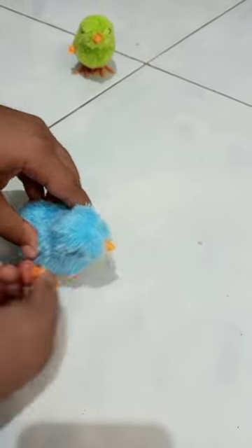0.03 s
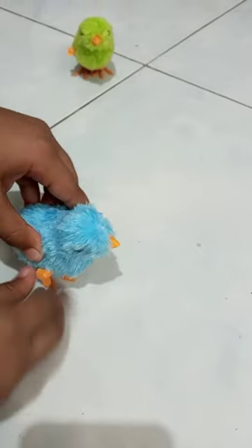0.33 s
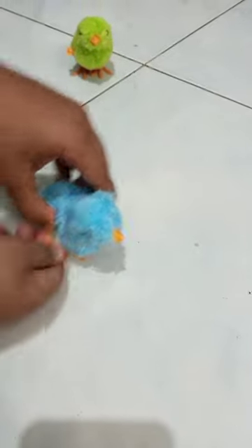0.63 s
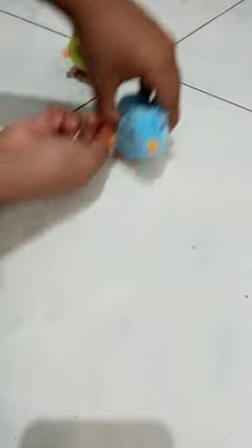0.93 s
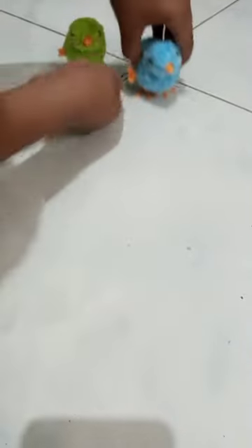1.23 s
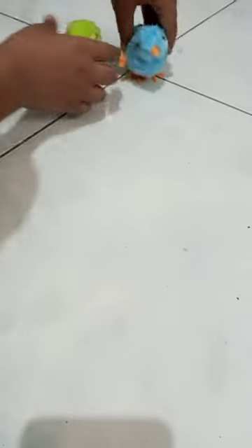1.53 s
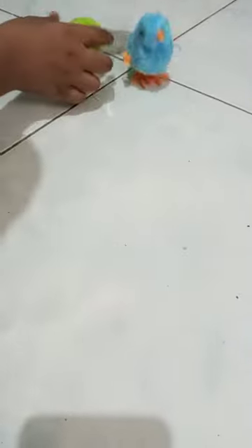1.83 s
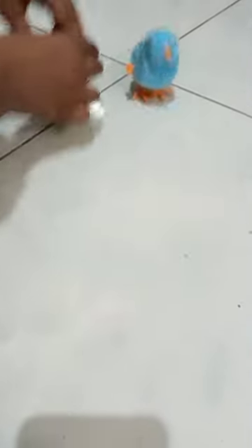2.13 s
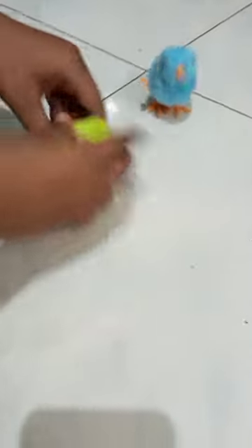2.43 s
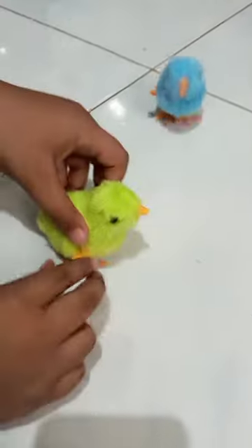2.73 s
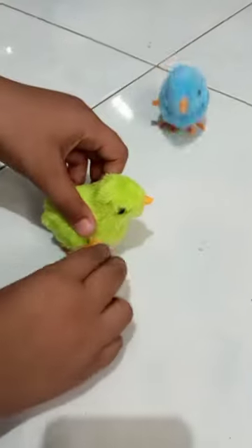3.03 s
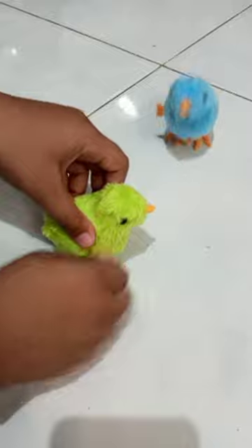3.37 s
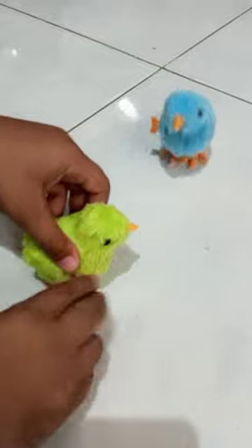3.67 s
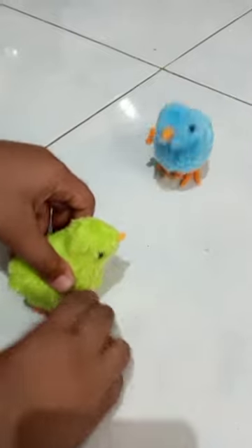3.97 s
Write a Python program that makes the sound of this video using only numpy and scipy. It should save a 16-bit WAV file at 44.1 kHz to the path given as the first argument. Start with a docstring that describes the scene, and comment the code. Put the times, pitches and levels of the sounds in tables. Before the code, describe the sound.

Rapid plastic clacking of a hopping wind-up toy on tile, after faint winding clicks.

```python
"""A plastic wind-up chick hops on a tiled floor, after being wound and set down with a scuff.
Seven times a second the spring snaps the legs, the gears whirr in the air and the feet clack down;
each hit makes the plastic body ring. A second toy is wound meanwhile. The small hard room rings
briefly. Behind it are a faint hiss, a low hum that comes and goes, a few dull knocks from handling
the toy, and the soft thuds of a hand bumping the microphone."""
import sys
import numpy as np
from scipy import signal
from scipy.fft import rfft, irfft
from scipy.io import wavfile

SR = 44100
rng = np.random.default_rng(int(sys.argv[2]) if len(sys.argv) > 2 else 0)


def log_audio(samples):
    """Write samples as a 16-bit WAV file to the path given in sys.argv[1]."""
    # one column per channel
    frames = np.atleast_2d(samples).T
    # limit to full scale, then quantise
    limited = np.clip(frames, -1, 1)
    pcm = np.round(limited * 32767).astype(np.int16)
    wavfile.write(sys.argv[1], SR, pcm)


N = 176400
TIME = np.arange(N) / SR

# The notes at which the toy's body rings:
# (pitch [Hz], width [Hz], level when kicking [dB], when landing [dB], when wound [dB])
BODY = [(1501,197,-4.5,-1.5,-30),(2645,206,-3,-13.5,-20.5),(2738,310,-6,-2.5,-11.5),(3138,580,-12,-11.5,-15),(4631,317,-1.5,-12,-4.5),(5072,260,-3,-16,-7.5),(5319,217,1,-11.5,-5.5),
        (6340,547,-7.5,-11,-8),(7036,350,-6.5,-12,-12.5),(8370,370,-9,-7.5,-24.5),(9337,385,-6,-5.5,-15.5),(9840,430,-8,-11,-19),(10650,980,-21.5,-18,-32),(12820,1140,-20,-16,-53)]
# Four pitch zones, low to high, that shape the tone of a hit: (centre [Hz])
ZONES_HZ = [1550, 2700, 5000, 8500]
# The legs kick off: (time [s], relative crack level [dB], ring level in each of the four zones [dB])
KICKS = [(1.6411, -15, -29.5, -25, -39, -31), (1.7253, -17, -36, -28, -37, -28),
         (1.8745, -33, -40.5, -34.5, -36, -29), (2.016, -15, -31.5, -34, -30.5, -30),
         (2.1555, -17, -40.5, -28, -32, -29.5), (2.2983, -16, -41.5, -28.5, -30.5, -28),
         (2.4434, -37, -45, -33, -34.5, -28), (2.592, -11, -42, -29.5, -31, -29),
         (2.7384, -8, -46.5, -32, -30.5, -29.5), (2.883, -10, -56, -38, -26.5, -28.5),
         (3.037, -9, -36, -30, -34.5, -30), (3.1767, -15, -36, -32.5, -28, -30),
         (3.3254, -12, -35.5, -30.5, -33, -31), (3.469, -19.5, -34.5, -37, -28, -28),
         (3.6131, -25, -46.5, -30.5, -30.5, -29.5), (3.7618, -30, -40, -43, -29.5, -30.5),
         (3.91, -21, -52, -34, -26, -32.5)]


def from_db(db):
    """Turn decibels into a number to multiply by."""
    return 10 ** (np.asarray(db) / 20)


def rms_one(x):
    """Scale a sound so that its average strength (rms) is 1."""
    return x / np.sqrt(np.mean(x ** 2) + 1e-20)


def unit_click(x):
    """Give a short sound the same energy as 10 ms of sound at strength 1."""
    return x * np.sqrt(.01 * SR / (np.sum(x ** 2) + 1e-20))


def add(out, start_s, x):
    """Mix x into out, beginning at start_s."""
    i = int(np.clip(start_s * SR, 0, N - 1))
    out[i:i + len(x)] += x[:N - i]


def keep_side(x, hz, side, order=2):
    """Keep the "low" or the "high" side of hz and fade out the other."""
    return signal.sosfilt(signal.butter(order, hz, side, fs=SR, output="sos"), x)


def resonate(x, hz, width_hz):
    """Make x ring at one pitch; a narrower width rings longer."""
    r = np.exp(-np.pi * 1.5 * width_hz / SR)
    b = (1 - r * r) / 2 * np.array([1, 0, -1])
    a = [1, -2 * r * np.cos(2 * np.pi * hz / SR), r * r]
    return signal.lfilter(b, a, signal.lfilter(b, a, x + 1e-18))


def colour(x, points):
    """Shape the tone of x along (pitch [Hz], level [dB]) points; the result has strength 1."""
    hz, db = np.transpose(points)
    freqs = np.maximum(np.arange(N // 2 + 1) * SR / N, 1)
    gain = from_db(np.interp(np.log(freqs), np.log(hz), db))
    return rms_one(irfft(rfft(x) * gain, N))


def grains(per_s, size):
    """Tiny taps at random moments, of random strength."""
    return (rng.random(size) < per_s / SR) * rng.standard_normal(size)


def contact(chatter_s):
    """Parts that meet buzz against each other briefly, then settle more quietly and slowly."""
    t = TIME[:1200]
    rise = 1 - np.exp(-(t + 1 / SR) / .00044)
    buzz = np.exp(-(t / chatter_s) ** 2)
    settle = from_db(-7) * np.exp(-t / (1.5 * chatter_s))
    return grains(per_s=6000, size=len(t)) * rise * (buzz + settle)


def clack(note_db, crack_db, chatter_s):
    """One hit gives a bright crack and rings all the body's notes, a little differently each time."""
    spread_db, detune = 2.5, .016
    force = contact(chatter_s)
    out = from_db(crack_db - 18.5) * unit_click(keep_side(force, 2380, "high"))
    for (hz, width, *_), db in zip(BODY, note_db):
        ring = resonate(force, hz * rng.normal(1, detune), width)
        out += from_db(rng.normal(db, spread_db)) * unit_click(ring)
    return out


def shell(ticks, note_db):
    """Small ticks ring through the toy's plastic body; the result has strength 1."""
    rings = [rms_one(resonate(ticks, hz, width)) for hz, width, *_ in BODY]
    return rms_one(sum(from_db(db) * ring for db, ring in zip(note_db, rings)))


def air():
    """A faint, steady background hiss."""
    # The tone of the hiss: (pitch [Hz], relative level [dB])
    tone = [(18, -57), (30, -10), (102, -3), (612, -6.5), (880, -4), (1200, -7), (1440, 1), (1920, 1.5),
            (2240, -5.5), (2620, 4), (3580, -19), (4530, -12), (9380, -27.5), (11000, -45), (15000, -29)]
    return from_db(-62) * keep_side(colour(rng.standard_normal(N), tone), 56, "high")


def rasps(note_db):
    """Fine ratchet teeth slip past in short runs as a key is turned."""
    # Runs of teeth: (start [s], length [s], level [dB], tilt toward the treble [dB per octave])
    runs = [(0,0.022,-57,7),(.052,0.035,-46.5,4),(0.503,0.017,-54,3),(0.788,0.039,-56.5,-7),(1.281,0.096,-64.5,-15),(2.967,0.098,-52,-2.5),(3.158,0.16,-43,-7),(3.25,.06,-62,2),(3.352,0.052,-44.5,13),(3.87,0.12,-48.5,-12)]
    out = np.zeros(N)
    octaves = np.log2(np.array(BODY)[:, 0] / ZONES_HZ[2])
    for start, length, db, tilt in runs:
        teeth = grains(per_s=890, size=int(length * SR))
        fade = signal.windows.tukey(len(teeth), .5)
        add(out, start, from_db(db) * shell(teeth, note_db + tilt * octaves) * fade)
    return out


def winding(note_db):
    """The key, the ratchet and loose parts click against the body."""
    # Clicks: (time [s], relative level [dB], tilt toward the treble [dB per octave])
    clicks = [(.006,-47.5,-1),(.017,-58,-3),(.028,-45,2),(0.043,-35,-2),(.081,-43,-5),(.111,-44,15),(0.121,-34.5,-7.5),(0.322,-59.5,12.5),(0.473,-54.5,-10.5),(0.503,-48.5,7),(.541,-45.5,-5),(0.658,-38,-5),(0.663,-38,-2.5),(0.72,-45,-2),(0.794,-50,-3),(.947,-51,-7),(0.956,-58.5,21),(0.991,-42.5,15.5),(1.175,-52.5,-16.5),(1.695,-49,-6),
              (2.777,-30.5,-7),(2.901,-32,-6),(3.214,-28,-4),(3.222,-29,-14),(3.401,-28.5,3),(3.434,-36.5,-10),(3.488,-32,-4),(3.928,-23.5,-1),(3.942,-44,-18)]
    out = np.zeros(N)
    octaves = np.minimum(np.log2(np.array(BODY)[:, 0] / ZONES_HZ[2]), 1)
    for start, db, tilt in clicks:
        add(out, start, clack(note_db + db + tilt * octaves, db, chatter_s=.0035))
    return out


def reflections():
    """The room's answer to a click: a near wall's echo and a tail that dies sooner in the treble."""
    split_hz, low_fade_s, high_fade_s = 7000, .3, .27  # each fade is the time to fall 60 dB
    tail_delay_s, wall_delay_s, wall_spread_s = .0053, .015, .0018
    t = TIME[:SR // 2]
    noise = rng.standard_normal((3, len(t)))
    low = keep_side(noise[0], split_hz, "low") * from_db(-60 * t / low_fade_s)
    high = keep_side(noise[1], split_hz, "high") * from_db(-60 * t / high_fade_s)
    tail = (low + high) * (t > tail_delay_s)
    tail += from_db(9.5) * resonate(tail, hz=1956, width_hz=212)  # the room rings most here
    wall = noise[2] * (t > wall_delay_s) * np.exp(-abs(t - wall_delay_s) / wall_spread_s)
    return from_db(-7.5) * tail / np.linalg.norm(tail) + from_db(-15.5) * wall / np.linalg.norm(wall)


def room(x):
    """The toy keeps moving, so every 70 ms of its sound meets a new set of echoes."""
    out, step = np.zeros(N), int(.07 * SR)
    for i in range(0, N, step):
        add(out, i / SR, signal.fftconvolve(x[i:i + step], reflections()))
    return out


def hum():
    """A low tone with a little rumble comes and goes."""
    # Times when the hum swells: (start [s], end [s], level [dB])
    swells = [(0.097,0.296,-66),(0.61,0.944,-61),(1.41,1.604,-60.5),(1.677,1.844,-60.5),(1.947,2.27,-60.5),(2.355,2.442,-57.5),(3.025,3.193,-61.5),(3.813,4.1,-62.5)]
    # The tone of the rumble: (pitch [Hz], relative level [dB])
    rumble_tone = [(25,-29),(60,-8),(105,9),(150,1),(220,-0.5),(400,-54)]
    hum_hz, fade_s, rest_db = 153.4, .055, -79
    level = np.full(N, from_db(rest_db))
    for start, end, db in swells:
        level += from_db(db) * np.clip(np.minimum(TIME - start, end - TIME) / fade_s + .5, 0, 1)
    tone = np.sqrt(2) * np.sin(2 * np.pi * hum_hz * TIME)
    rumble = from_db(-7.5) * colour(rng.standard_normal(N), rumble_tone)
    return level * (tone + rumble)


def knocks():
    """Dull knocks as the toy is handled, the last with a faint lingering ring."""
    # Knocks: (time [s], level [dB], pitch [Hz], time to fall 60 dB [s])
    hits = [(.115,-60,136,0.036),(.122,-61,980,0.044),(0.138,-57.5,138,0.052),(.142,-58,807,0.087),(.19,-57.5,514,0.49)]
    out, t = np.zeros(N), TIME[:SR]
    for start, db, hz, fade_s in hits:
        ring = np.sin(2 * np.pi * hz * t) * from_db(-60 * t / fade_s)
        rise = 1 - np.exp(-20 * t / fade_s)
        add(out, start, from_db(db) * unit_click(ring * rise))
    return out


def squeal():
    """The sliding feet sing a rough note that mostly falls."""
    # The path of the note: (time [s], pitch [Hz], level [dB])
    path = [(0.936,5160,-63),(.95,5150,-45),(.962,5150,-45.5),(.97,5290,-69),(0.999,5380,-54),(1.03,5200,-46.5),(1.07,4840,-58),(1.11,4700,-51),(1.14,4500,-66)]
    times, hz, db = np.transpose(path)
    width_hz = 300
    grip = keep_side(rng.standard_normal(N) + 1j * rng.standard_normal(N), width_hz / 2, "low")
    phase = 2 * np.pi * np.cumsum(np.interp(TIME, times, hz)) / SR
    note = rms_one(np.real(grip * np.exp(1j * phase)))  # slow noise moved up to the note's pitch
    return note * from_db(np.interp(TIME, times, db, left=-120, right=-120))


def stroke(loudness, tone):
    """Plastic sticks and slips over the tile in many tiny jerks; the grip limits their size."""
    times, db = np.transpose(loudness)
    spread_db, stutter_hz = 2, 180
    stutter = rms_one(keep_side(rng.standard_normal(N), stutter_hz, "low"))
    slip_size = np.tanh(from_db(spread_db * stutter) / 2)
    slips = np.sign(grains(per_s=2400, size=N)) * slip_size
    return colour(slips, tone) * from_db(np.interp(TIME, times, db, left=-120, right=-120))


def scuff():
    """The feet drag twice over the tile, squealing and catching now and then."""
    # How each drag swells and fades: (time [s], level [dB])
    first_drag = [(.97,-70),(1.003,-60),(1.016,-42),(1.045,-46),(1.065,-45.5),(1.095,-45.5),(1.135,-66),(1.16,-86)]
    second_drag = [(1.16,-79),(1.187,-58.5),(1.215,-41.5),(1.232,-43),(1.25,-56),(1.265,-77),(1.3,-86)]
    # The tone of each drag: (pitch [Hz], relative level [dB])
    first_tone = [(1470, -39), (2500, -9), (3170, -15), (3340, -31), (4140, -32), (4680, 0), (5290, 0),
                  (5730, -3), (6380, 0.5), (11200, -13), (14000, -19)]
    second_tone = [(1180, -60), (2000, -28), (2620, 4), (3400, -13), (3680, -55), (4440, -8), (5400, -1),
                   (6780, -6.5), (9470, -5), (12300, -23), (14000, -14)]
    # The feet catch and squeak: (time [s], level [dB], pitch [Hz], buzz time [s])
    catches = [(1.025,-44,5550,0.0018),(1.037,-42,6260,0.0022),(1.049,-47,7200,0.0042),(1.216,-58,2600,0.011),(1.236,-40,9400,0.0083),(1.246,-46,9600,0.0012)]
    out = stroke(first_drag, first_tone) + stroke(second_drag, second_tone) + squeal()
    for start, db, hz, chatter_s in catches:
        squeak = resonate(contact(chatter_s), hz, width_hz=700)
        add(out, start, from_db(db) * unit_click(squeak))
    return out


def blows(hits, note_db, chatter_s):
    """Each hard hit rings the body with its own tone and is followed by four tiny bounces."""
    bounce_db, spread_db, bounce_fade_s = -19.5, 1.5, .038
    out, log_hz = np.zeros(N), np.log(np.array(BODY)[:, 0])
    for start, db, *zone_db in hits:
        levels = note_db + np.interp(log_hz, np.log(ZONES_HZ), zone_db)
        crack_db = db - 15.5
        add(out, start, clack(levels, crack_db, chatter_s))
        for delay_s in np.cumsum(rng.uniform(.0087, .015, size=4)):
            gain = from_db(rng.normal(bounce_db, spread_db)) * np.exp(-delay_s / bounce_fade_s)
            add(out, start + delay_s, gain * clack(levels, crack_db, chatter_s / 2))
    return out


def kicks(note_db):
    """The spring snaps the legs and throws the toy into the air."""
    return blows(KICKS, note_db, chatter_s=.0033)


def whirr(note_db):
    """After each kick the gears run free, and their teeth tick through the body."""
    wait_s, length_s, teeth_per_s, jitter_s = .025, .03, 520, .00048
    teeth = np.zeros(N)
    for kick_s, *_ in KICKS:
        for tooth_s in np.arange(0, length_s, 1 / teeth_per_s):
            add(teeth, kick_s + wait_s + tooth_s + rng.normal(0, jitter_s), rng.standard_normal(1))
    return from_db(-59.5) * shell(teeth, note_db)


def landings(note_db):
    """The plastic feet clack down on the tile."""
    # Landings: (time [s], relative crack level [dB], ring level in each of the four zones [dB])
    hits = [(1.7765, -11, -33.5, -32.5, -21.5, -28.5), (1.9167, -17, -40, -28.5, -18.5, -28),
            (2.0637, -12, -34.5, -25, -19, -29), (2.2053, -9, -33.5, -30, -18, -31),
            (2.3468, -8, -35, -25, -18.5, -29), (2.4922, -9, -38, -27, -20, -32),
            (2.6401, -7.5, -40.5, -24, -19, -33), (2.7844, -25, -33.5, -25.5, -22, -28.5),
            (2.9404, -12, -38, -28, -21, -32), (3.0782, -21, -39.5, -28.5, -17.5, -29),
            (3.2283, -19, -37.5, -29.5, -28, -31), (3.3692, -20, -35.5, -24, -21.5, -32),
            (3.5199, -20, -33, -27, -17.5, -30), (3.6624, -27, -34, -30.5, -21.5, -30),
            (3.8145, -25, -39, -27.5, -21, -29.5), (3.9634, -10, -35, -24, -20.5, -29.5)]
    return blows(hits, note_db, chatter_s=.0037)


def bumps():
    """Soft thuds of the hand that holds the microphone, each with a little deep rumble."""
    # Thuds: (time of the peak [s], level [dB], pitch [Hz], time to fall to half [s])
    thuds = [(2.874,-54,86,0.016),(2.921,-30,112,0.012),(2.959,-47,144,0.042),(2.998,-28.5,113,0.0049),(3.026,-42,108,0.014),(3.141,-43.5,96,0.0067),(3.433,-44.5,72,0.019),(3.457,-33,127,0.0052),(3.498,-44,105,0.024),(3.571,-42,97,0.021),(3.661,-60.5,91,0.054)]
    low_noise = keep_side(rng.standard_normal(N), 80, "low")
    rumble = from_db(-21) * rms_one(keep_side(low_noise, 40, "high", order=4))
    out = np.zeros(N)
    for peak_s, db, hz, half_s in thuds:
        phase = 2 * np.pi * (hz * (TIME - peak_s) + rng.random())
        overtone = from_db(-14) * np.sin(1.73 * phase)
        swell = 1 / (1 + ((TIME - peak_s) / half_s) ** 4)
        out += from_db(db) * (np.sin(phase) + overtone + rumble) * swell
    return out


def scene():
    """Mix the toys, their echoes and the background into one channel."""
    kick_db, landing_db, winding_db = np.transpose(BODY)[2:]
    hops = kicks(kick_db - 4.5) + landings(landing_db - 6.5) + whirr(kick_db)
    keys = winding(winding_db - 6.5) + rasps(winding_db)
    toys = keep_side(hops + keys, 1260, "high", order=4)
    feet = scuff()
    hiss = air()
    echoes = room(toys + from_db(-4.5) * feet)  # the scuff reaches the room less than the clacks do
    return (toys + feet + echoes + hiss + hum() + bumps() + knocks())[None]


def record(dry):
    """Cut away the very highest treble steeply."""
    cutoff_hz = 14300
    return signal.sosfilt(signal.ellip(10, .3, 70, cutoff_hz, fs=SR, output="sos"), dry)


dry = scene()
out = record(dry)
log_audio(out)
```